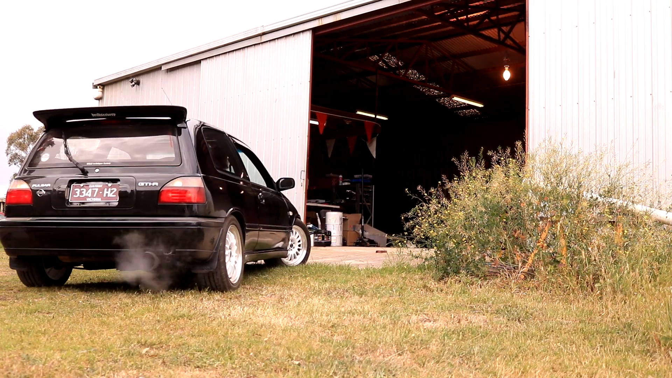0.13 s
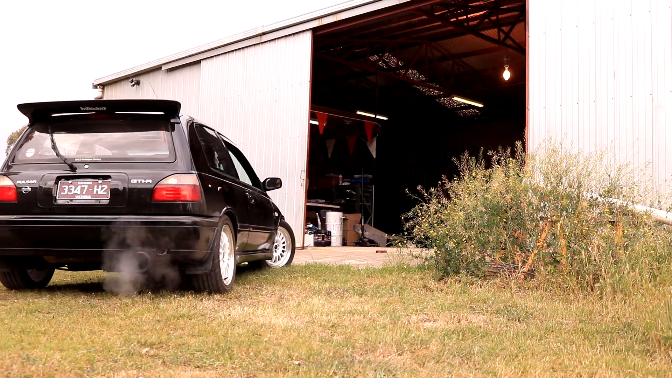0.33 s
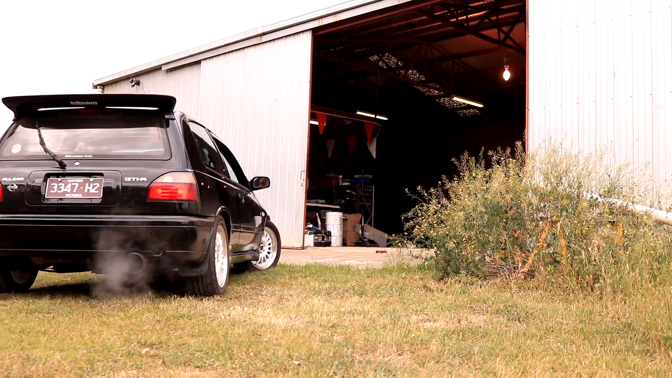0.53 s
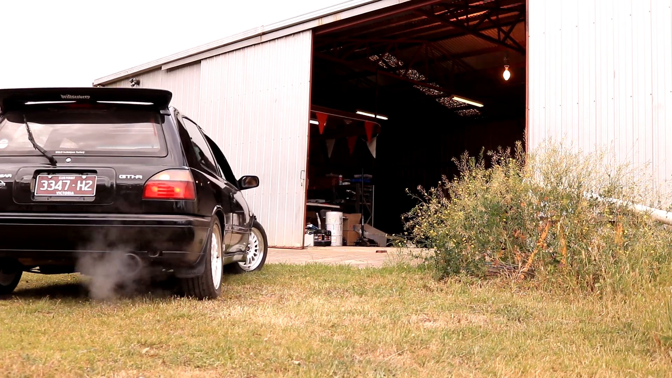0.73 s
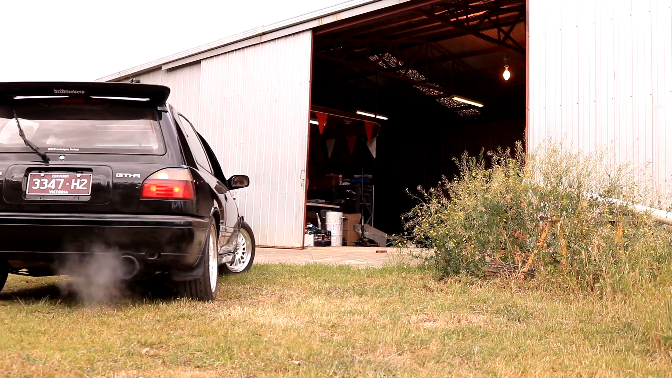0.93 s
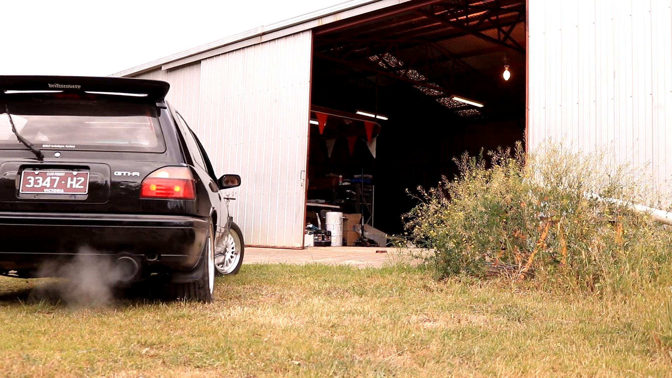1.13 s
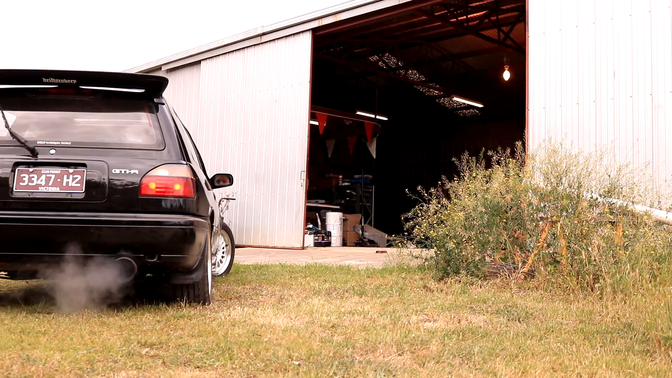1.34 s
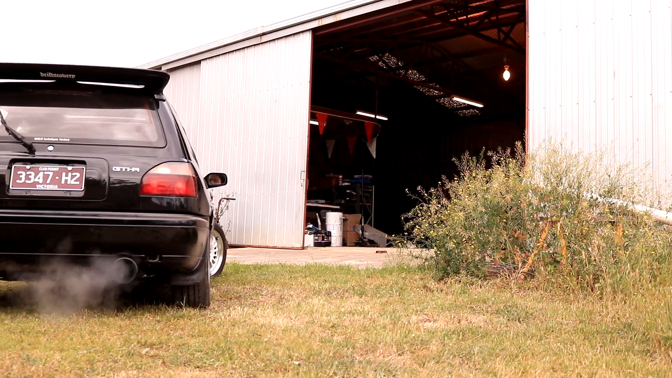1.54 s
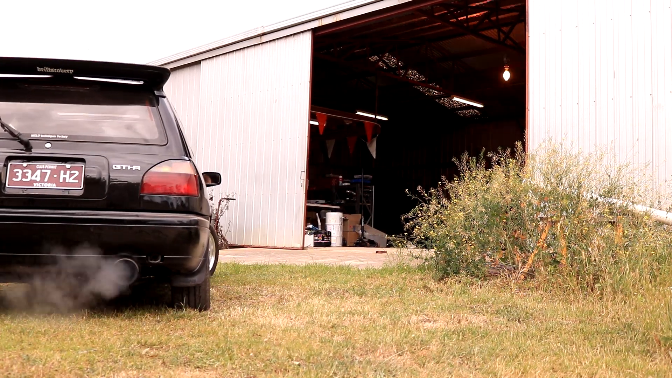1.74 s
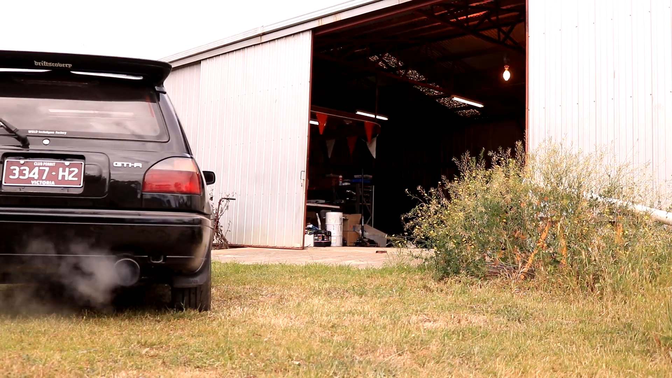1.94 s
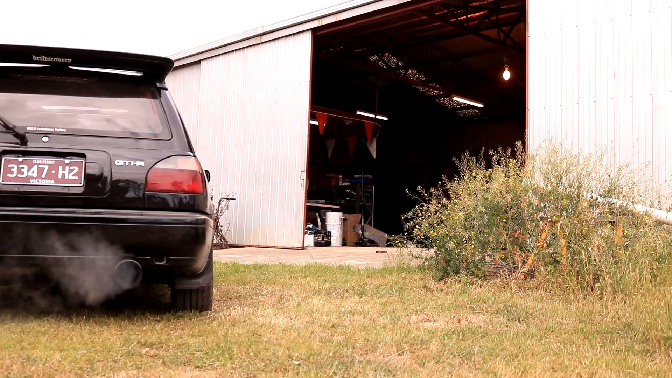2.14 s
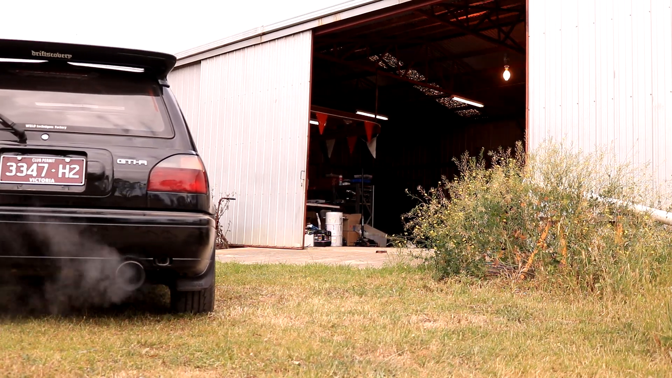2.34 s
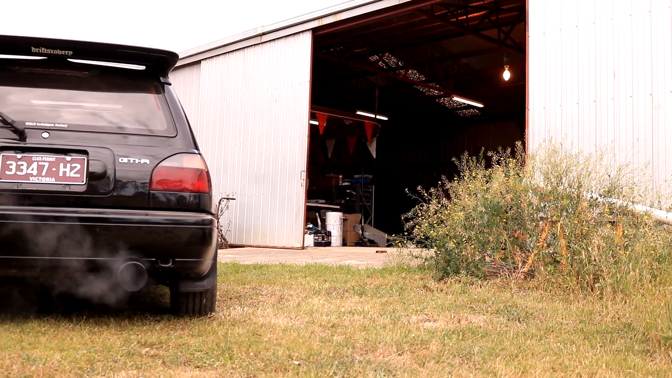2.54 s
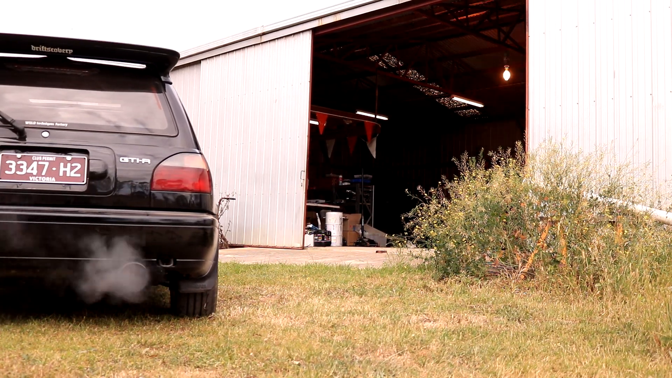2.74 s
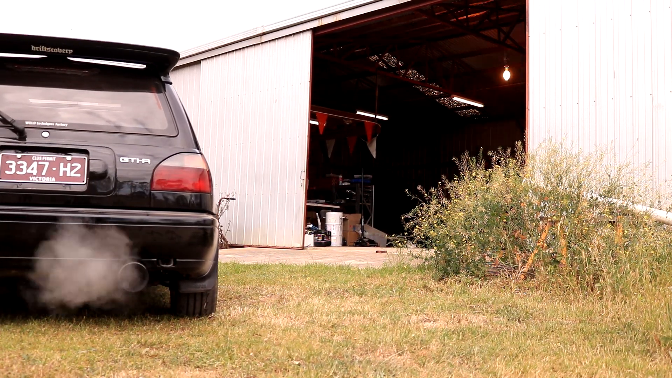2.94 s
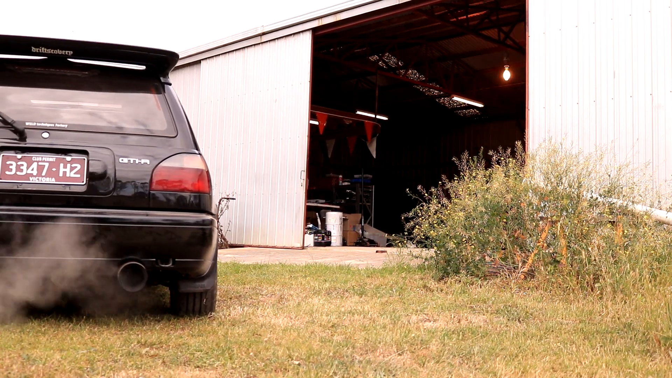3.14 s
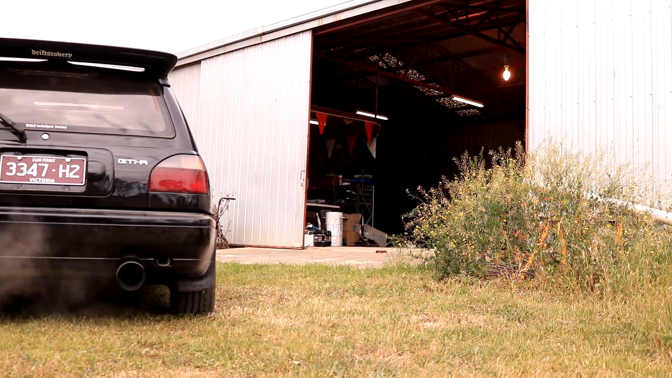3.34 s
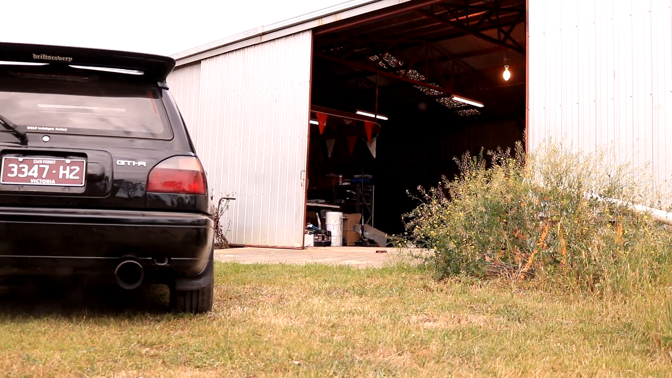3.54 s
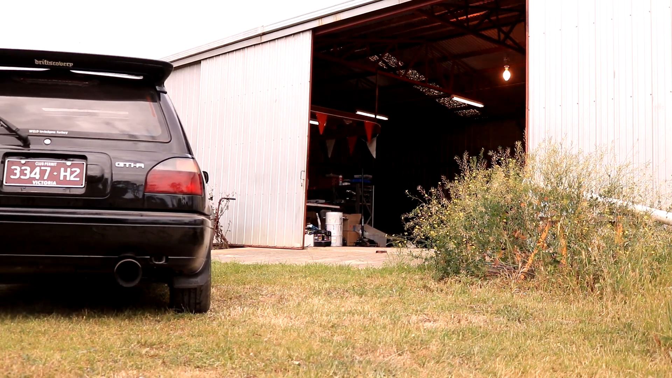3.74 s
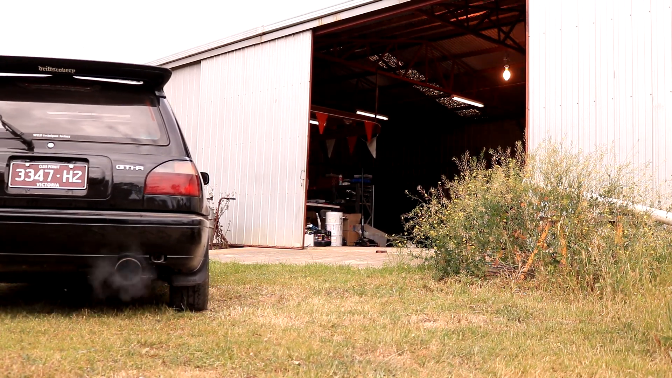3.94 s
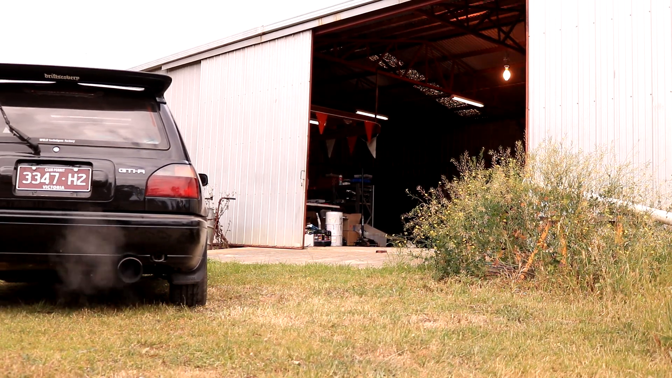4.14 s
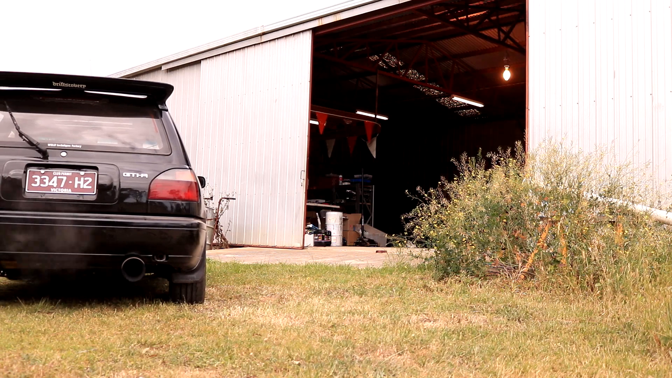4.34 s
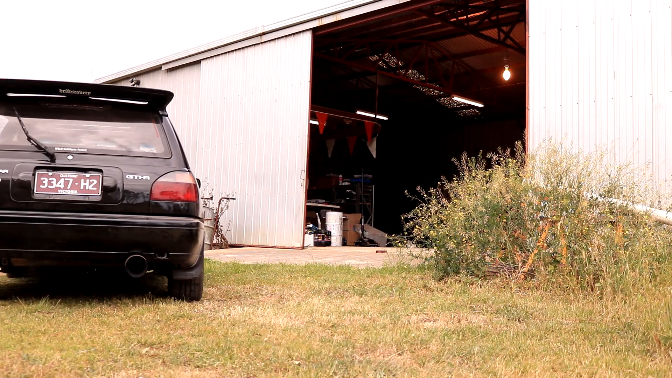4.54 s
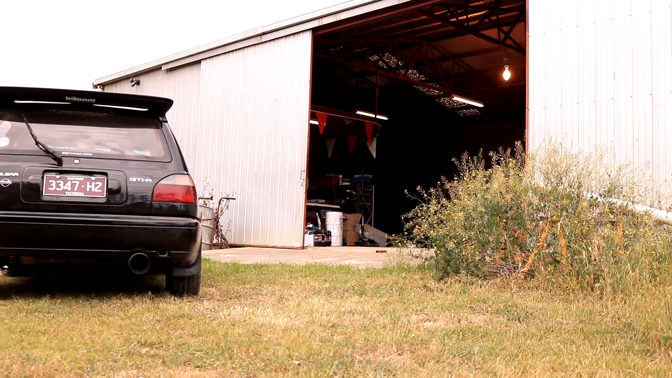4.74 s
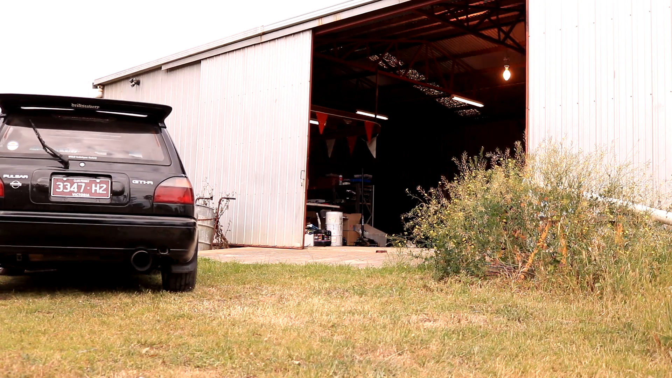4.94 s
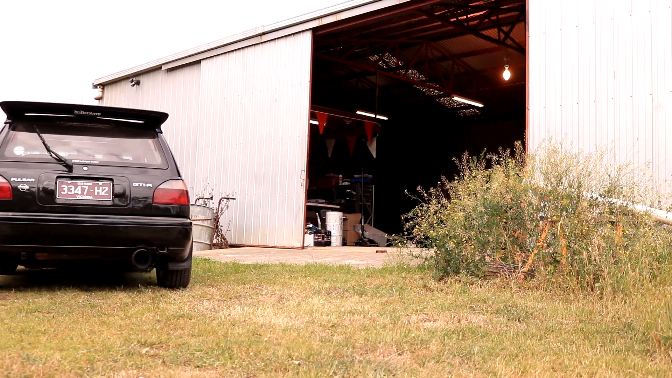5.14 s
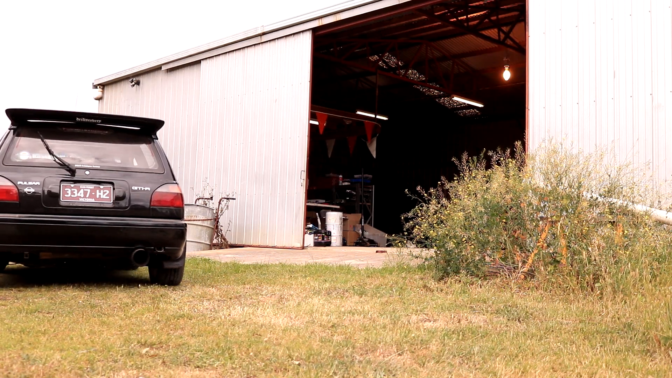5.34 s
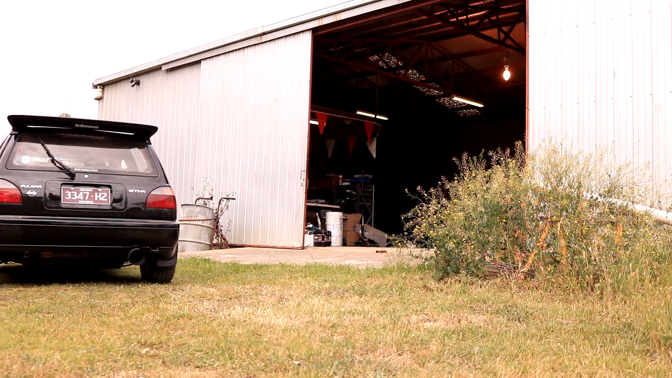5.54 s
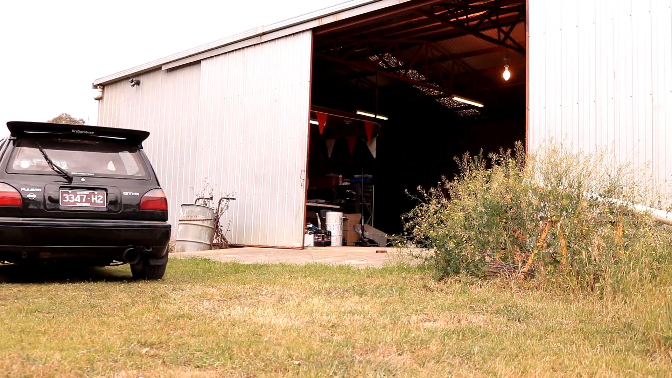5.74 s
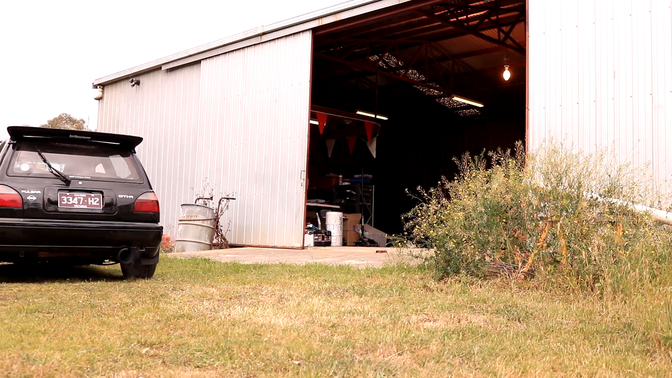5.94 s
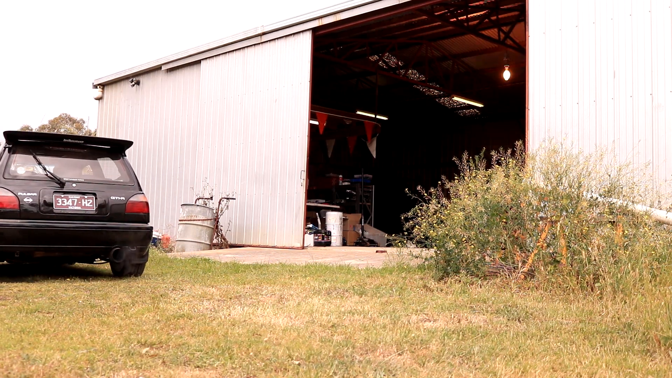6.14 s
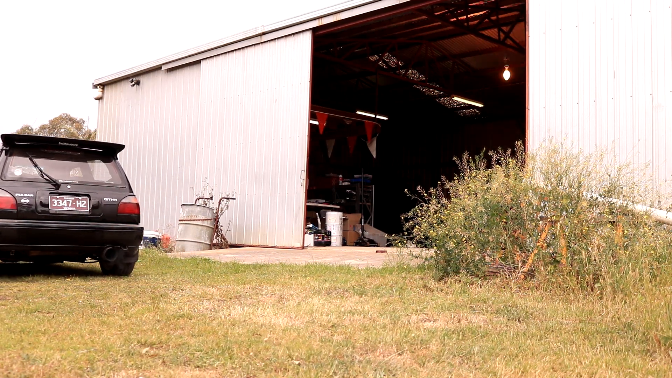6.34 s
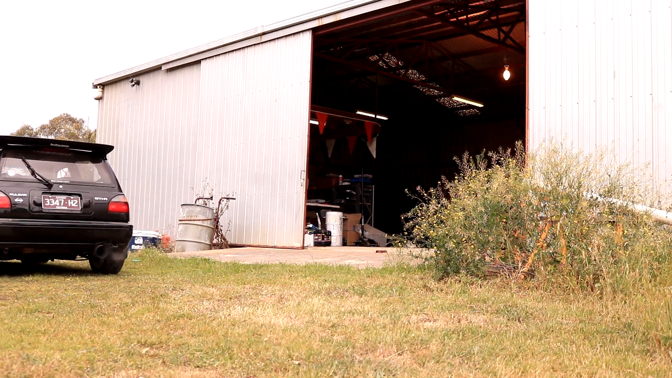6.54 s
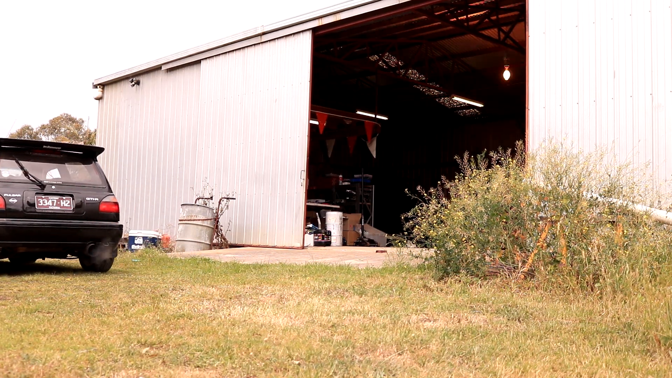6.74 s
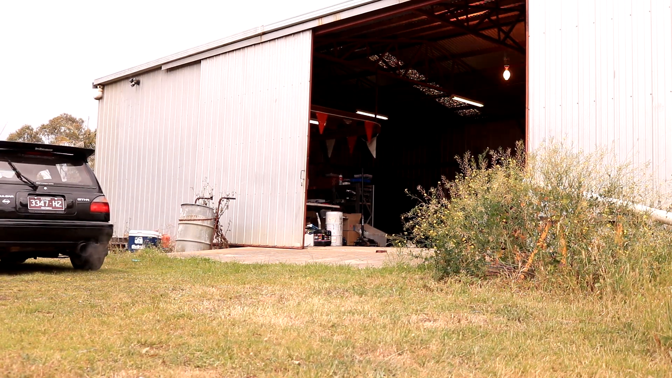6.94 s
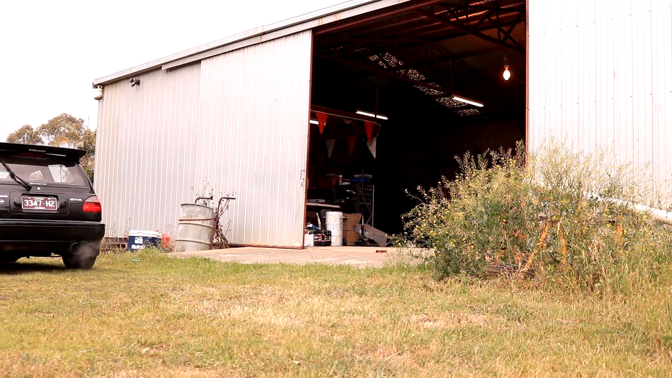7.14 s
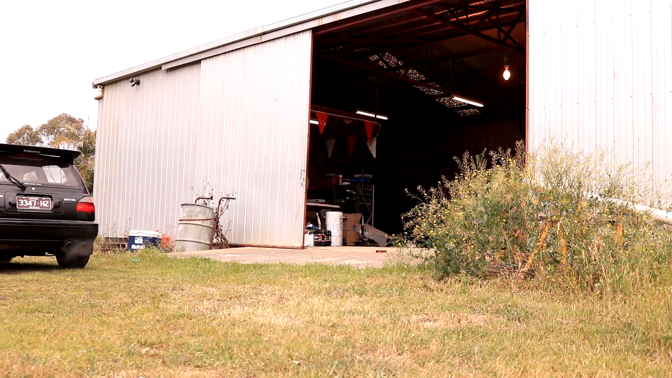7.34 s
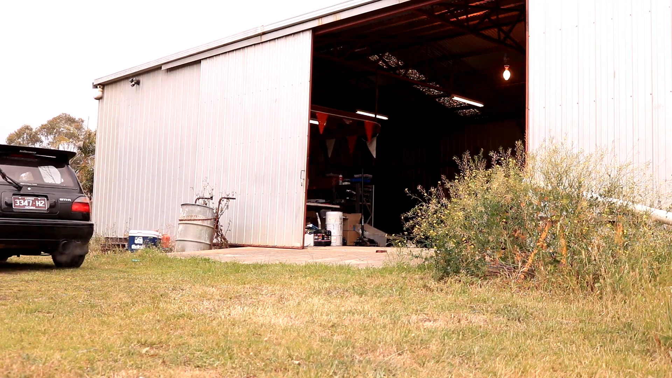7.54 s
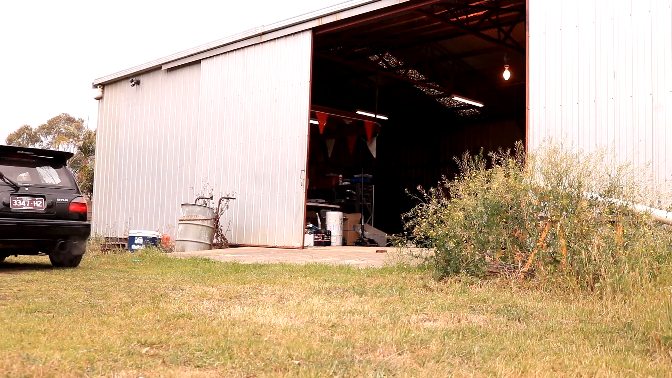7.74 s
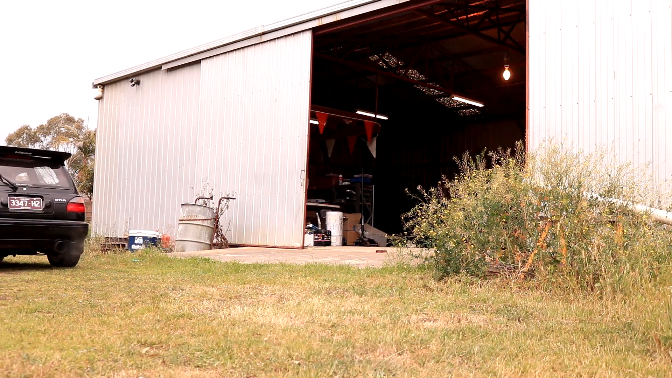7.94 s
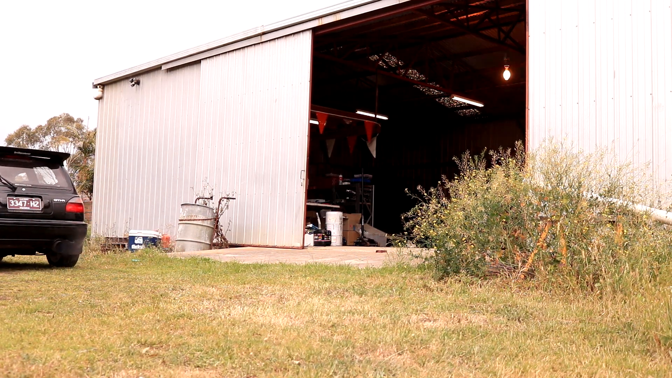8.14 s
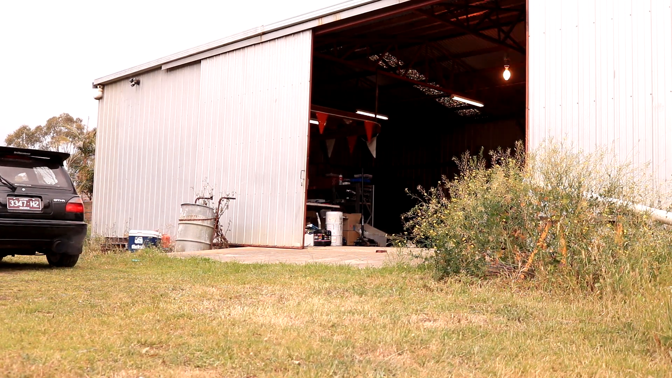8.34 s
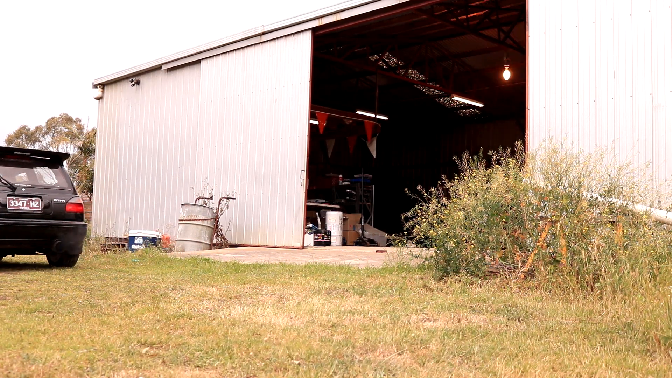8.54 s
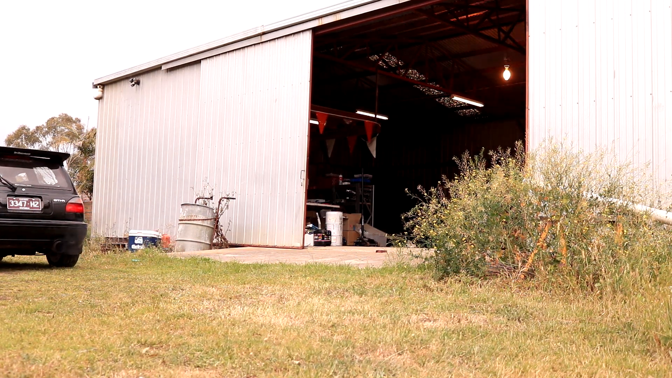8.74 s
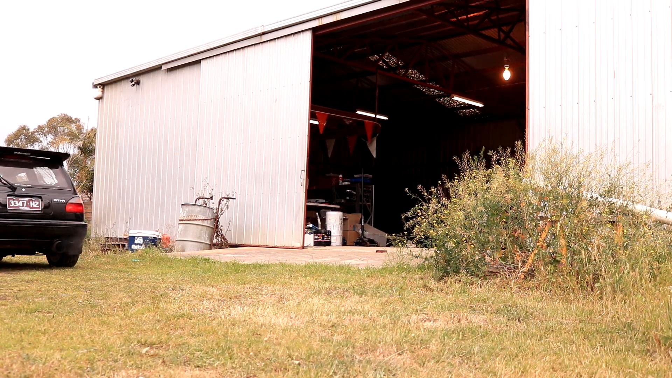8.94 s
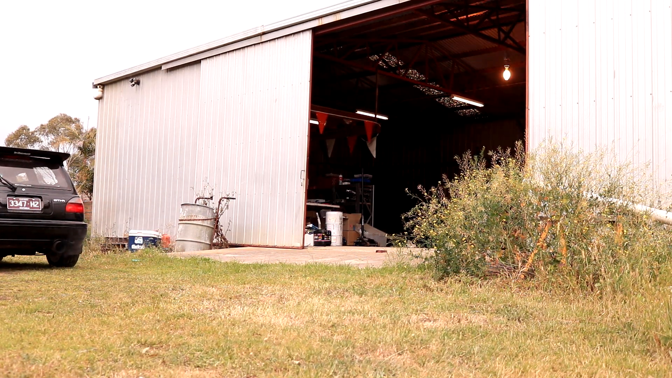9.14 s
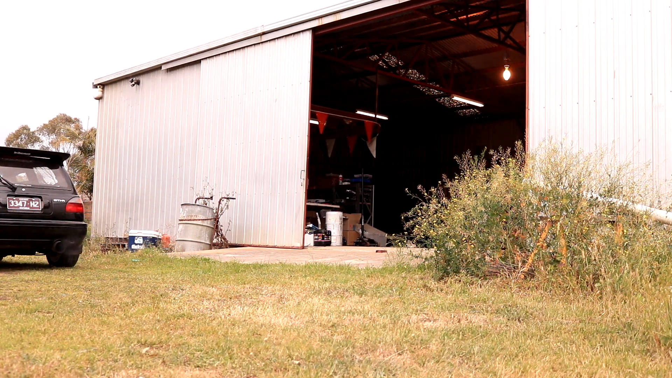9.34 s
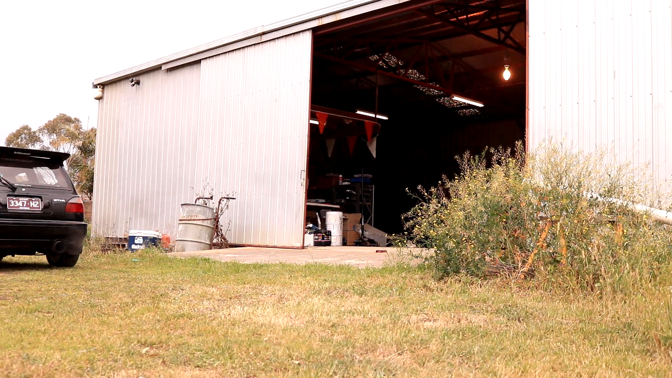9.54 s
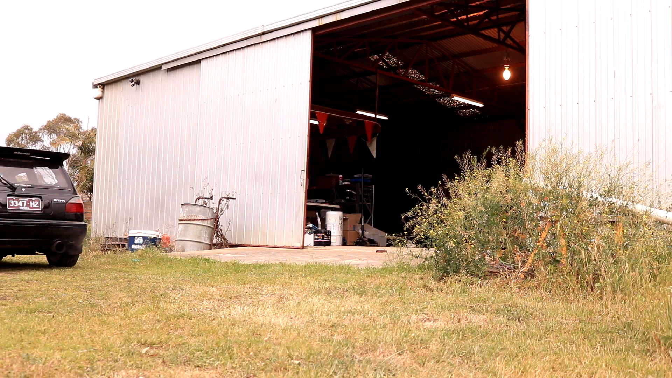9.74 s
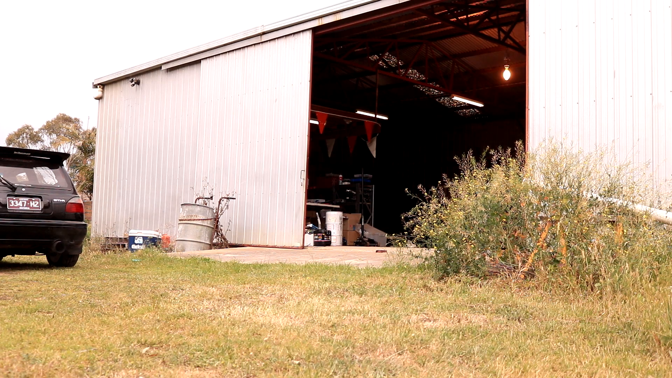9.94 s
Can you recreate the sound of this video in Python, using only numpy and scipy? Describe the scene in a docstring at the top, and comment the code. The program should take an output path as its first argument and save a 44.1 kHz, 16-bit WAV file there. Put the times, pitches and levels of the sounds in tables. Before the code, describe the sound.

Outdoors on grass, a four-cylinder car with a wide exhaust rumbles backward toward a close stereo microphone. A high brake squeal comes first, tyres rustle, a distant bird chirps. Six abrupt throttle blips bark, the loudest distorting, with soft turbo flutter between them. The car then draws away, stumbling with scattered dull pops and gas spits, before a fainter squeal and a quick, steady idle with bird calls.

```python
"""A brake squeals as a four-cylinder car with a wide exhaust backs over grass toward the listener; a bird calls
far off before and after the blips. Six throttle blips, the loudest clipping; a turbo flutters on the shut throttle.
The car pulls away stumbling on scattered hard firings, the brake squeals again, and a fast idle settles.
Summed firing orders make the beat; filtered pulses and noise make burble, rasp, thumps, gas and tyres; the pipe
rings in decaying sines, the squeal is a sine with its octave, and the bird is sliding sines with a noise echo."""
import sys
import numpy as np
from scipy import signal
from scipy.fft import rfft, irfft, next_fast_len
from scipy.io import wavfile
from scipy.ndimage import uniform_filter1d

SR = 44100
rng = np.random.default_rng(int(sys.argv[2]) if len(sys.argv) > 2 else 0)


def generate_wav(sig):
    """Save sig (samples, or channels by samples) to the path in sys.argv[1] as 16-bit PCM at SR."""
    pcm = np.round(np.clip(np.atleast_2d(sig).T, -1, 1) * 32767).astype(np.int16)
    wavfile.write(sys.argv[1], SR, pcm)


N = 440105

# All levels are relative settings, before the gains in the functions.
# Engine speed: t/s, firing rate/Hz
FIRING_RATE = [(0, 37.15), (.683, 35.75), (1.652, 36.85), (2.258, 42.37), (2.71, 36.21), (2.981, 67.89),
               (3.124, 57.5), (3.373, 82.15), (3.74, 47.95), (3.935, 38.35), (4.151, 61.77), (4.276, 48.78),
               (4.436, 63.17), (4.623, 44.55), (4.802, 62.95), (5.038, 44.6), (5.178, 55.75), (5.4, 37.11),
               (5.68, 29.56), (5.9, 25.3), (6.2, 24.02), (6.45, 24.5), (6.62, 30.82), (6.8, 29.43),
               (6.958, 29.19), (7.574, 35.38), (7.971, 40.78), (8.526, 44.55), (9.05, 45.44),
               (9.411, 44.24), (9.98, 45.7)]
# Engine between blips: t/s, steady firing level/dB, burble level/dB, rasp level/dB, gas hiss level/dB
ENGINE = [(0, -28.5, -25.5, -37, -52), (.6, -25, -16.5, -35, -54), (1.3, -22.5, -22.5, -34.5, -54),
          (2, -22, -19, -30.5, -52.5), (2.62, -21.5, -25.5, -32, -53), (2.95, -21, -14, -29.5, -49.5),
          (3.11, -23.5, -14.5, -28.5, -49.5), (3.3, -17.5, -18.5, -28.5, -48),
          (3.55, -20, -11.5, -24, -47.5), (3.7, -26, -15, -34.5, -50.5), (3.82, -26, -20, -41.5, -52.5),
          (4.23, -27, -16, -34, -50), (4.55, -26.5, -20.5, -37, -51), (4.95, -28, -21, -34, -51),
          (5.25, -29.5, -20, -39, -53), (5.45, -36.5, -22, -53, -54.5), (5.65, -34.5, -22, -38.5, -57),
          (5.95, -41, -27, -47.5, -56.5), (6.3, -42.5, -24, -55, -58), (6.63, -41.5, -23.5, -52, -58),
          (6.92, -40.5, -29, -44, -57), (7.199, -35.5, -23, -45.5, -57.5), (7.6, -31, -19.5, -39, -57),
          (7.999, -29, -15, -37, -56.5), (8.6, -25.5, -20, -34.5, -56.5), (9.98, -26, -24, -35.5, -57)]
# Load passed on to firing, burble, rasp and hiss: share/(dB per dB of load)
LOAD_SHARES = [0.93, 0.77, 1.21, 0.17]
# Throttle blips: open t/s, shut t/s, opening time/s, first load/dB, last load/dB, intake lag/s,
# intake chuff level/dB, bright snap level/dB, fade time/s
BLIPS = [(2.718, 2.971, 0.024, 10.5, 8, 0.0063, -30.5, -44.5, 0.16),
         (3.123, 3.387, 0.016, 11.5, 7, .004, -39, -52, 0.1),
         (3.919, 4.128, 0.037, 16, 12.5, 0.0048, -30, -36, 0.13),
         (4.285, 4.431, 0.032, 16, 13.5, 0.019, -34, -46, 0.085),
         (4.626, 4.813, 0.004, 14.5, 11, .004, -32, -49.5, 0.07),
         (5.038, 5.182, 0.01, 12.5, 13.5, 0.018, -33, -46, 0.1)]
# The engine catches for a few firings on a shut throttle: from t/s, to t/s, load/dB
CATCHES = [(3.515, 3.53, -0.5), (3.84, 3.906, 7), (4.163, 4.207, 3), (5.763, 5.83, 2.5), (6.028, 6.16, 2),
           (6.384, 6.535, 9.5), (6.685, 6.841, 5.5), (6.938, 7.153, 3.5)]
CATCH_S, LIFT_S = 0.022, 0.024  # time constants: a catch coming on, any load letting go
# Silencer acting on each firing order: f/Hz, level/dB
SILENCER = [(30, -36), (36, -10.5), (42, -5.5), (52, 0), (63, 2), (73, 3.5), (79, -0.5), (84, -6.5),
            (91, -6.5), (108, -5.5), (126, -4), (145, -2.5), (165, -0.5), (182, -0.5), (200, -3),
            (215, -6.5), (260, -18)]
# Extra load on orders 1 to 5, raising the second, third and fifth: share/(dB per dB of load)
ORDER_SHARES = [-0.19, 0.14, 0.052, -0.22, 0.22]
FIFTH_DB = -8  # extra drop on the fifth order
# Each cylinder's runner: front level/dB, timing/samples, echo delay/samples, echo share
CYLINDERS = [(-4, -7, 80, 0.63), (2, 12.5, 130, -0.46), (-1, -11.5, 74, 0.29), (0, -3.5, 124, 0.65)]
FRONT_LEAD, BURN_LEAD = 52.3, 50.3  # samples ahead of the beat
SHIFT_S, SHIFT = 6.3, 2  # from here on the cylinder pattern is counted two places further
# How evenly the engine burns between its hard firings: t/s, evenness 0-1
EVENNESS = [(0, .6), (.7, .8), (1.8, .8), (2.3, .35), (2.7, 0), (5.2, 0), (5.4, .55), (7.2, .55), (8.3, .9),
            (9.98, .9)]
# Firing rates over which the fronts sink into a roar: from f/Hz, to f/Hz
BLEND = (58, 72)
SCATTER_PER_DB = 0.07  # dB of front scatter per dB of load
CRISP_PER_DB = 0.06  # fronts stand further out of the gas noise under load
PUSH_PER_DB = 0.08  # every burn pulse is pushed up by load
# Colour of an uneven burn: f/Hz, level/dB
PIPE = [(12, -85.5), (26, -41), (38, 6), (60, 1.5), (90, 0.5), (130, 2.5), (185, 6), (260, 1.5), (400, -3),
        (800, -15), (2500, -58)]
# Colour of the tail-pipe rasp: f/Hz, level/dB
TAIL = [(150, -22), (200, -10.5), (225, -1), (270, -2), (340, -11.5), (400, -10.5), (435, -6), (480, -16),
        (520, -16), (600, -18), (700, -25), (850, -26), (1050, -35.5), (1250, -45.5), (1500, -63),
        (2050, -47), (3000, -60), (5500, -100)]
# Treble lift of the rasp, before load: t/s, level/dB
BITE = [(0, -17), (1.3, -19), (2.6, -1.5), (2.95, 4), (3.15, 1), (3.4, 1), (3.8, -1), (4.1, -2),
        (4.4, -5.5), (4.7, -2), (5.15, -8), (5.5, -15), (6, 3), (6.45, -13), (6.8, 0), (7.3, 3), (8, -3),
        (9.98, -1.5)]
BITE_PER_DB = 0.4762  # a loaded exhaust turns brighter
# Pipe modes: f/Hz, t60/s, lag/s, level over the rasp/dB for cylinders 1 to 4
RINGS = [(433, .06, 0, -14, 7, -5, 0), (573, 0.07, 0, -14, -2, -4, -1), (272, 0.09, 0, -10, -6, 7, -10),
         (180, .045, 0, 13, -20, -20, -20), (180, .045, .0028, -20, -20, 11, -20)]
RING_PER_DB = -0.09  # rings sink into the rasp under load
# Hard firings, mostly in the stumble: t/s, thump level/dB, gas spit level/dB
STUMBLES = [(3.011, -9, -47), (3.84, -18, -36), (3.943, -11, -51), (4.21, -13.5, -57), (4.288, -11.5, -53),
            (5.244, -24, -58), (5.279, -15.5, -60), (5.342, -23, -62), (5.38, -23, -61), (5.424, -24, -62),
            (5.484, -21, -62), (5.526, -21, -61), (5.553, -17.5, -59), (5.597, -21, -64), (5.662, -24, -64),
            (5.699, -21.5, -70), (5.768, -17, -47), (5.805, -16, -67), (5.843, -19.5, -44.5),
            (5.962, -20, -37.5), (6.046, -28, -62), (6.084, -19, -47), (6.159, -18, -40), (6.242, -27, -62),
            (6.372, -26, -64), (6.415, -18, -44.5), (6.452, -20, -63), (6.489, -15, -50), (6.53, -31, -65),
            (6.697, -22, -45), (6.728, -19.5, -68), (6.765, -20.5, -60), (6.799, -21.5, -67),
            (6.866, -19.5, -37), (6.971, -27.5, -45.5), (7.039, -20, -45), (7.133, -21, -41.5),
            (7.384, -33, -60), (7.5, -28, -43)]
# Colour of a hard firing heard far off: f/Hz, level/dB
THUMP = [(12, -52.5), (30, -12.5), (50, 4), (90, 1.5), (170, -3), (240, -9), (330, -20), (600, -25),
         (1000, -49), (2500, -90)]
SPIT_AIR_DB, SPIT_S = -0.5, 0.0034  # airy part of a spit: offset from the spit level, time to peak
# Turbo flutter on a shut throttle: first puff t/s, end t/s, first puff level/dB
FLUTTER = [(3.499, 3.8, -42.5), (3.812, 3.85, -54), (4.242, 4.26, -47), (4.461, 4.6, -42),
           (4.827, 4.95, -41.5), (5.209, 6.8, -44), (8.564, 8.7, -48.5)]
FLUTTER_S, FLUTTER_FADE_DB, PUFF_S = 0.096, -0.13, 0.013  # gap, level step per puff, time to peak
# Gas and engine-bay hiss: f/Hz, level/dB
HISS = [(410, -10.5), (700, -3.5), (1000, -10.5), (1260, -8.5), (1380, -13), (1590, -11), (1930, -15.5),
        (2530, -13.5), (4600, -19), (5700, -19.5), (7000, -21), (11700, -31.5), (13300, -38), (14600, -38),
        (15600, -52)]
# Bright gas bursts: f/Hz, level/dB
BRIGHT = [(1500, -2.0), (3000, -4), (4500, -4.0), (7000, -7.5), (11000, -16.0), (15500, -31)]
# Intake chuffs: f/Hz, level/dB
INTAKE = [(1500, -33), (2300, -7.5), (3200, -4.5), (4300, -14.0), (8000, -19), (15500, -32)]
# Turbulent roar at the pipe mouth: f/Hz, level/dB
ROAR = [(300, -20), (600, 0), (900, 0.5), (1300, -5), (1900, -19), (3000, -46)]
# Likeness of the roar at the two ports: f/Hz, likeness 0-1
ROAR_SAME = [(300, 1.0), (3000, .8)]
ROAR_DB, ROAR_PER_DB = -63, 1.65  # unloaded level, growth per dB of load
# Broad gas puffs in the stumble: t/s, peak level/dB, width/s
PUFFS = [(5.79, -50, .03), (6.47, -41.5, 0.052), (6.78, -40.5, 0.054)]
# Colour of those puffs: f/Hz, level/dB
PUFF = [(200, -24), (400, 11.5), (800, -3.5), (1300, -18), (2500, -39)]
# Faint wavering hum: t/s, level/dB
HUM = [(0, -60), (2.5, -58), (5.3, -52), (6.5, -66), (9.98, -59)]
HUM_HZ = 972
# Tyres crushing grass: t/s, level/dB
ROLLING = [(0, -39), (1.3, -33), (2.3, -27), (3.7, -24), (4.7, -40), (5.4, -32), (6.5, -37.5), (7.5, -55),
           (9.98, -80)]
# A wheel rides over a tussock: t/s, peak level/dB, width/s
TUSSOCKS = [(.57, -25.5, 0.1), (1.42, -25, 0.035), (1.97, -23, 0.085)]
# Colour of crushed grass: f/Hz, level/dB
GRASS = [(60, -34), (130, 14), (250, 0.5), (400, -2.5), (700, -17.5), (1500, -45), (3000, -85)]
# Likeness of the grass at the two ports: f/Hz, likeness 0-1
GRASS_SAME = [(100, 0.29), (1000, 1.0)]
# Two brake squeals, each with rows: t/s, level/dB, octave level/dB
SQUEAL = [
    [(0.12, -76, -90), (0.142, -43, -75), (0.168, -32.5, -61), (0.242, -46, -59), (0.28, -29, -62),
     (0.306, -24.5, -59), (.33, -28, -54), (.37, -27.5, -63), (0.432, -30.5, -52), (0.468, -41, -67),
     (.52, -39.5, -59), (0.584, -42.5, -63), (0.604, -64, -85), (.635, -50, -90), (.68, -57, -78),
     (.71, -52, -90), (.735, -64, -90), (.77, -55, -90), (.82, -64, -92), (.87, -61, -90), (1.0, -63, -90)],
    [(7.79, -77, -90), (7.81, -61, -80), (7.848, -49.5, -74), (7.946, -46, -70), (8.016, -61, -78),
     (8.132, -62, -80), (8.166, -61, -80), (8.226, -69, -85), (8.26, -78, -90)],
]
# Pitch of each squeal: f/Hz
SQUEAL_PITCH = [3801, 3826]
# The pad lets go: t/s, depth 0-1, width/s
SLIPS = [(0.191, .9, .005), (.235, 1, 0.0063), (0.409, .62, .006), (.501, 0.9, 0.0042), (8.059, .8, .005),
         (8.12, .8, .005)]
# Bird notes sliding down to a held pitch, and a faint steady squeal near 2920 Hz:
# t/s, level/dB, held f/Hz, slide f/Hz, length/s
BIRD = [(.04, -54, 2500, 180, 0.091), (.38, -51, 2440, 260, 0.079), (0.704, -55, 2620, 127, 0.037),
        (0.733, -52, 2460, 290, 0.12), (.78, -64, 2920, 5, .22), (0.991, -51, 2910, 5, .08),
        (1.045, -48, 2480, 350, .05), (1.087, -54, 2440, 340, 0.13), (1.425, -51, 2400, 360, 0.064),
        (1.804, -51, 2430, 360, .08), (1.82, -57, 2430, 39, 0.059), (2.152, -46.5, 2550, 190, .04),
        (2.189, -52, 2460, 130, .07), (5.37, -50.5, 2770, 40, .04), (5.424, -52, 2590, 260, 0.1),
        (5.825, -52, 2710, 130, .05), (5.872, -56, 2600, 190, 0.078), (6.373, -59, 2450, 250, 0.12),
        (7.136, -61, 2400, 140, .1), (7.67, -59, 2580, 84, 0.087), (8.023, -55, 2600, 220, 0.077),
        (8.368, -51, 2604, 220, 0.028), (8.4, -48.5, 2490, 265, 0.12), (8.673, -56, 2380, 52, .07),
        (8.687, -59, 3300, 67, 0.033), (8.734, -57, 3280, 71, 0.035), (8.73, -56, 2600, 117, 0.054),
        (8.766, -46, 2500, 310, 0.1), (9.037, -55, 3240, 84, .03), (9.084, -55, 3330, 64, .05),
        (9.082, -52, 2540, 550, 0.06), (9.118, -48, 2470, 220, 0.084), (9.699, -59, 2640, 39, 0.036),
        (9.745, -57, 2600, 97, 0.047)]
BIRD_ECHO, BIRD_WAVER_DB = 1.0, 2.5  # echo share; rms flicker of far notes through the air
# Likeness of airy sounds at the microphone pair: f/Hz, likeness 0-1
SAME = [(700, .8), (1500, .55), (2200, .3), (3500, .4), (7000, .55), (11000, .35), (15000, .25)]
# Left against right at the microphone pair: f/Hz, level/dB
TILT = [(40, -2), (100, -0.5), (500, 0.3), (1500, 1), (3000, 2), (5000, 2.5), (15000, 5)]
LAG_RAD, LAG_S = 0.27, 6.3e-5  # phase and delay of the right port
EDGE_HZ = 15750  # band limit


def orders(rate, turns):
    """Steady exhaust beat: harmonics of the firing rate, each leading the pulse below the silencer's boom."""
    out = np.zeros(N)
    for k, db in enumerate(order_levels(rate), 1):
        lead = 1.8 / (1 + (k * rate / 56) ** 8) - .2
        level_db = db + 0.078 * wander(N, 1500)
        out += np.sqrt(2) * gain_of(level_db) * np.cos(2 * np.pi * k * turns + lead)
    return out


def burble(rate, turns, swirl):
    """Uneven burns: each firing's departure from the steady beat strikes the pipe, with swirling gas."""
    at, _ = firings(turns)
    luck = rng.standard_normal(len(at))
    burns = np.zeros(N)
    burns[np.maximum(at - round(BURN_LEAD), 0)] = np.maximum(luck, -.8) + PUSH_PER_DB * load()[at]
    piped = signal.oaconvolve(evened(burns) + .7 * swirl, causal(PIPE))[:N]
    low, _ = split(piped, 240)
    return .52 * (1 - .75 * controls(EVENNESS)[0]) * gain_of(engine_levels()[1]) * evened(low, 5000)


def rasp(rate, turns, swirl):
    """Sharp pressure fronts, echoed in each runner, and turbulent gas at the tail pipe; load adds bite."""
    _, burble_db, rasp_db, _ = engine_levels()
    at, cylinder = firings(turns)
    timing_luck, size_luck = rng.standard_normal((2, len(at)))
    front_db, timing, delay, echo = np.array(CYLINDERS)[cylinder].T
    start = at - FRONT_LEAD + timing + 3 * timing_luck
    size = gain_of(front_db + (1.3 + SCATTER_PER_DB * load()[at]) * size_luck)
    fronts = np.zeros(N)
    fronts[np.clip(start, 0, N - 1).astype(int)] = size
    fronts[np.clip(start + delay, 0, N - 1).astype(int)] += echo * size

    # clean burns give clean fronts; fast firing sinks them
    firing_db = 10 * np.log10(sum(gain_of(db) ** 2 for db in order_levels(rate)))
    clean = np.clip((firing_db - burble_db) / 5, .15, 1.9) + CRISP_PER_DB * load()
    even = controls(EVENNESS)[0]
    melt = np.interp(rate, BLEND, [1, .45])
    blast = melt * np.maximum(clean, 1.3 * even) * evened(fronts)
    gas = .42 * (1 - .7 * even) * swirl
    _, high = split(signal.oaconvolve(blast + gas, causal(TAIL))[:N], 215)
    body, bite = split(evened(high, 5000), 666)
    bite *= gain_of(controls(BITE)[0] + BITE_PER_DB * load())
    return gain_of(rasp_db) * (body + bite)


def swirling_gas(turns):
    """Turbulence that is strongest just after each firing."""
    return evened(rng.standard_normal(N) * (2.0 + np.exp(-(turns % 1) / 0.85)))


def rings(turns):
    """Short pipe tones after each firing, each cylinder striking its own blend: the lope of the idle."""
    at, cylinder = firings(turns)
    t, out = np.arange(6000) / SR, np.zeros(N)
    scatter_db = 3 - 1.8 * controls(EVENNESS)[0][at]
    for hz, t60, lag, *cylinder_db in RINGS:
        blows = np.zeros(N)
        blows[at] = gain_of(np.array(cylinder_db)[cylinder] + scatter_db * rng.standard_normal(len(at)))
        u = np.maximum(t - abs(lag), 0)
        ring = gain_of(-60 * u / t60) * np.minimum(u / 0.0038, 1) * np.sin(2 * np.pi * hz * u)
        out += signal.oaconvolve(blows, ring)[:N]
    return gain_of(engine_levels()[2] + RING_PER_DB * load()) * out


def thumps():
    """Hard firings: single strong pressure pulses from the pipe, peaking on time."""
    out, pulse = np.zeros(N), causal(THUMP)
    for s, db, _ in STUMBLES:
        add(out, s - pulse.argmax() / SR, gain_of(db) * pulse / pulse.max())
    return out


def roar():
    """Turbulent gas noise at the pipe mouth that swells with load."""
    return gain_of(ROAR_DB + ROAR_PER_DB * load()) * pair_noise(ROAR, 2.2, ROAR_SAME)


def flutter():
    """Envelope of turbo flutter: evenly spaced air puffs on a shut throttle, each a little softer."""
    out, t = np.zeros(N), np.arange(12000) / SR
    for first, end, db in FLUTTER:
        for k, s in enumerate(np.arange(first, end, FLUTTER_S)):
            add(out, s, gain_of(db + k * FLUTTER_FADE_DB) * puff_shape(t, PUFF_S))
    return out


def intake(turns):
    """Envelopes of intake chuffs and their bright snaps: an opening throttle gulps air on every stroke."""
    opened, snaps = np.zeros((2, N))
    t = np.arange(12000) / SR
    for s, _, rise, *_, lag, db, snap_db, fade in BLIPS:
        gulp = (1 - np.exp(-t / (0.5 * rise))) * np.exp(-t / fade)
        add(opened, s + lag, gain_of(db) * gulp)
        add(snaps, s + lag, gain_of(snap_db) * gulp)
    stroke = puff_shape((turns + .02) % 1, 0.15)
    return opened * stroke, snaps * stroke ** 2


def spits():
    """Envelopes of the tick and the airy puff of gas that each hard firing spits."""
    ticks, airs = np.zeros((2, N))
    t = np.arange(12000) / SR
    for s, _, db in STUMBLES:
        add(ticks, s, gain_of(db) * (t / 0.0035) * np.exp(1 - t / 0.0018))
        add(airs, s, gain_of(db + SPIT_AIR_DB) * puff_shape(t, SPIT_S))
    return ticks, airs


def gas(turns):
    """Hiss throbbing with the firings, plus noise gated by flutter, intake strokes and spits."""
    throb = evened(1 + 0.52 * np.exp(-((turns - .1) % 1) / 0.96), 4000)
    steady = gain_of(engine_levels()[3] + 9.0) * throb * pair_noise(HISS, 1.82)
    chuffs, snaps = intake(turns)
    ticks, airs = spits()
    bursts = 0.75 * (flutter() + snaps + airs) * pair_noise(BRIGHT, 1.0)
    return steady + bursts + (chuffs + ticks) * pair_noise(INTAKE, 0.98)


def gas_puffs():
    """Soft, broad swells of gas noise in the stumble."""
    return swells(PUFFS) * pair_noise(PUFF, 4.6)


def hum():
    """Faint sine whose level and phase drift."""
    level_drift, phase_drift = wander((2, N), 2000)
    turn = 2 * np.pi * HUM_HZ * np.arange(N) / SR + 1.45 * phase_drift
    return gain_of(controls(HUM)[0] + 2.7 * level_drift) * np.sin(turn)


def tyres():
    """Lumpy low rustle of wheels crushing grass, swelling over tussocks."""
    crush = gain_of(controls(ROLLING)[0]) + swells(TUSSOCKS)
    return crush * pair_noise(GRASS, 2.7, GRASS_SAME)


def squeal():
    """Pad and disc stick and slip at one disc mode, with a faint octave, right of the exhaust."""
    out = np.zeros(N)
    for rows, hz in zip(SQUEAL, SQUEAL_PITCH):
        s, db, octave_db = np.transpose(rows)
        t = np.arange(s[0], s[-1], 1 / SR)
        chatter_db = .7 * wander(len(t), 400)
        grip = np.ones(len(t))
        for slip, depth, width in SLIPS:
            grip *= 1 - min(depth, 1) * np.exp(-((t - slip) / width) ** 2)
        turn = 2 * np.pi * hz * t + 0.5 * wander(len(t), 1000)
        tone = gain_of(np.interp(t, s, db) + chatter_db) * np.sin(turn)
        tone += gain_of(np.interp(t, s, octave_db) + 2 * chatter_db) * np.sin(2 * turn)
        add(out, s[0], np.sqrt(2) * grip * tone * signal.windows.tukey(len(t), .05))
    return np.array([np.roll(out, 2), out]) * gain_of([[-1.2], [1.2]])  # left port two samples later


def bird():
    """Near-sine bird notes and a faint steady squeal, flickering through the air, with a long outdoor echo."""
    out = np.zeros(N)
    for s, db, held_hz, slide_hz, length in BIRD:
        u = np.arange(0, 1, 1 / (length * SR))
        hz = held_hz + slide_hz * np.exp(-u * length / 0.0132)
        shape = u ** 0.43 * (1 - u) ** 1.6
        add(out, s, gain_of(db) * np.sin(2 * np.pi * np.cumsum(hz) / SR) * shape / shape.max())
    out *= gain_of(BIRD_WAVER_DB * wander(N, 300))
    echo = rng.standard_normal((2, 14000)) * np.exp(-np.arange(14000) / 2500.0)
    echo /= np.linalg.norm(echo[0])
    heard = out + BIRD_ECHO * signal.oaconvolve(out[None], echo, axes=1)[:, :N]
    return heard * gain_of([[.7], [-.7]])  # a little louder on the left


def load():
    """Engine load in dB over the slow state: quick rise, a slope while open, release."""
    t = np.arange(0, N, 32) / SR
    load_db = np.zeros(len(t))
    catches = [(start, end, CATCH_S, db, db) for start, end, db in CATCHES]
    for opened, shut, rise, first_db, last_db, *_ in BLIPS + catches:
        held = 1 - np.exp(-np.maximum(t - opened, 0) / rise)
        held *= np.exp(-np.maximum(t - shut, 0) / LIFT_S)
        load_db += held * np.interp(t, [opened, shut], [first_db, last_db])
    return np.interp(np.arange(N) / SR, t, load_db)


def engine_levels():
    """Firing, burble, rasp and hiss in dB: the slow state plus each layer's share of the load."""
    load_db = load()
    return [slow + share * load_db for slow, share in zip(controls(ENGINE), LOAD_SHARES)]


def order_levels(rate):
    """Five firing orders in dB: the firing level coloured by the silencer at each order's pitch."""
    firing_db, load_db = engine_levels()[0], load()
    levels = [firing_db + share * load_db + read(SILENCER, k * rate)
              for k, share in enumerate(ORDER_SHARES, 1)]
    levels[-1] = levels[-1] + FIFTH_DB
    return levels


def firings(turns):
    """The sample of each firing and its place in the cylinder pattern."""
    at = np.flatnonzero(np.diff(np.floor(turns)))
    return at, (np.arange(len(at)) + SHIFT * (at > SHIFT_S * SR)) % len(CYLINDERS)


def pair_noise(points, patchy_db, same=SAME):
    """Coloured noise with drifting patches in time and pitch, partly alike at the two ports."""
    frames, hz = N // 128 + 5, np.fft.rfftfreq(512, 1 / SR)
    a, b, c, d, patches = rng.standard_normal((frames, 257, 5)).T
    patches = evened(uniform_filter1d(uniform_filter1d(patches, 8, 0), 16, 1))
    alike = np.clip(read(same, hz), -1, 1)[:, None]
    left, other = a + 1j * b, c + 1j * d
    z = np.array([left, alike * left + np.sqrt(1 - alike ** 2) * other])
    z *= gain_of(read(points, hz)[:, None] + patchy_db * patches)
    return evened(signal.istft(z, nperseg=512, noverlap=384)[1][:, :N])


def wander(shape, span):
    """Slow random drift with rms 1: noise smoothed twice over a span of samples."""
    return evened(uniform_filter1d(uniform_filter1d(rng.standard_normal(shape), span), span))


def puff_shape(t, peak):
    """A quick rise to 1 at the peak and a longer fall."""
    return (t / peak) * np.exp(1 - t / peak)


def swells(table):
    """Sum of bell-shaped swells."""
    t = np.arange(N) / SR
    return sum(gain_of(db) * np.exp(-((t - s) / width) ** 2) for s, db, width in table)


def gain_of(db):
    """Decibels to gain."""
    return 10 ** (np.asarray(db) / 20)


def evened(x, span=None):
    """Rms 1 over the whole, or over a sliding span of samples."""
    if span is None:
        power = np.mean(x ** 2)
    else:
        power = abs(uniform_filter1d(uniform_filter1d(x ** 2, span), span))
    return x / np.sqrt(power + 1e-20)


def read(points, hz):
    """A spectrum table read on a log-frequency axis."""
    f, value = np.transpose(points)
    return np.interp(np.log(hz + 1), np.log(f + 1), value)


def controls(table):
    """Each column of a curve table at every sample."""
    s, *columns = np.transpose(table)
    return [np.interp(np.arange(N) / SR, s, c) for c in columns]


def add(mix, s, sound):
    """Mixes a sound in at s seconds."""
    part = mix[round(s * SR):][:len(sound)]
    part += sound[:len(part)]


def causal(points, size=8192):
    """Minimum-phase impulse response of a colour: it rings only after the blow."""
    level_db = np.maximum(read(points, abs(np.fft.fftfreq(size, 1 / SR))), -100)
    log_gain = np.log(gain_of(level_db))
    return np.fft.ifft(np.exp(np.conj(signal.hilbert(log_gain)))).real[:size // 2]


def split(x, edge_hz):
    """The parts of x below and above a soft edge."""
    size = next_fast_len(N)
    z, hz = rfft(x, size), np.fft.rfftfreq(size, 1 / SR)
    low = 1 / (1 + (hz / edge_hz) ** 8)
    return [irfft(z * g, size)[:N] for g in (low, 1 - low)]


def scene():
    """Everything as it reaches the two ports."""
    rate, = controls(FIRING_RATE)
    turns = .066 + np.cumsum(rate) / SR  # one turn per firing
    swirl = swirling_gas(turns)
    exhaust = orders(rate, turns) + burble(rate, turns, swirl) + rasp(rate, turns, swirl)
    car = exhaust + rings(turns) + thumps()
    air = roar() + gas(turns) + gas_puffs() + hum()
    return car + air + tyres() + squeal() + bird()


def record(dry):
    """The port pair shifts and tilts left against right; the converter clips at full scale; then the band limit."""
    size = next_fast_len(N)
    hz = np.fft.rfftfreq(size, 1 / SR)
    half = gain_of(read(TILT, hz) / 2) * np.exp(.5j * (LAG_RAD + 2 * np.pi * hz * LAG_S))
    ports = irfft(rfft(dry, size) * [half, 1 / half], size)[:, :N]
    band = signal.firwin(511, EDGE_HZ, window=("kaiser", 9), fs=SR)
    return signal.oaconvolve(np.clip(ports, -1, 1), band[None], "same")


dry = scene()
out = record(dry)
generate_wav(out)
```